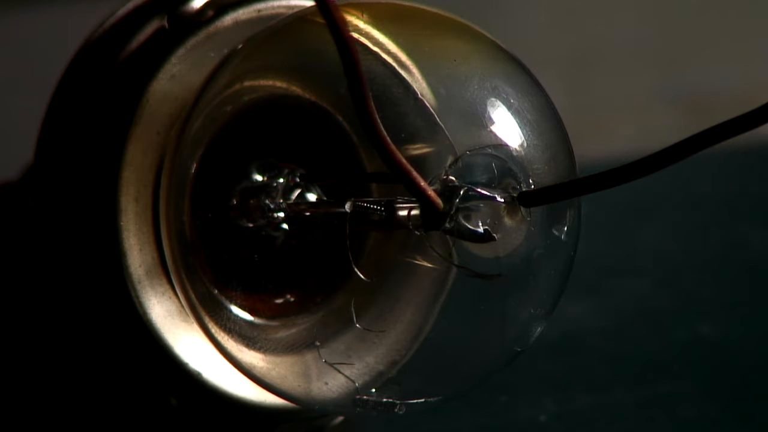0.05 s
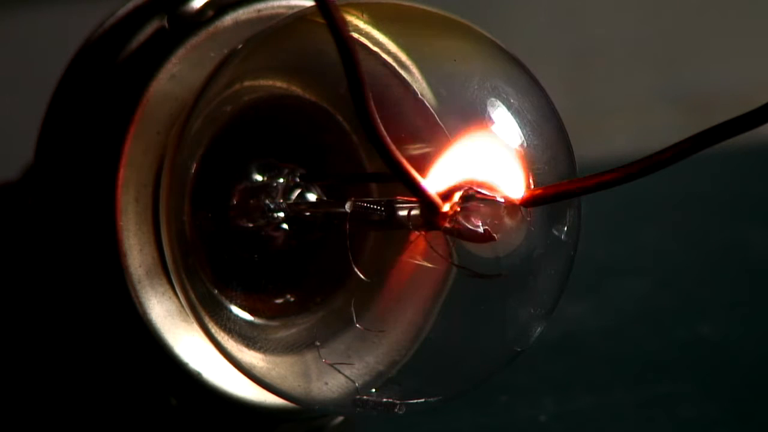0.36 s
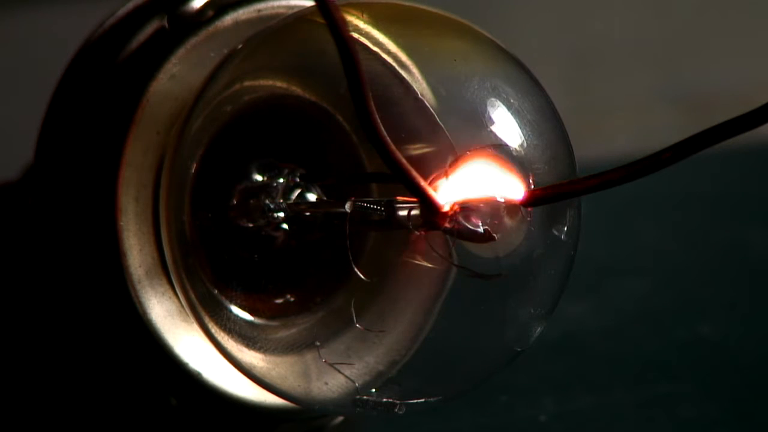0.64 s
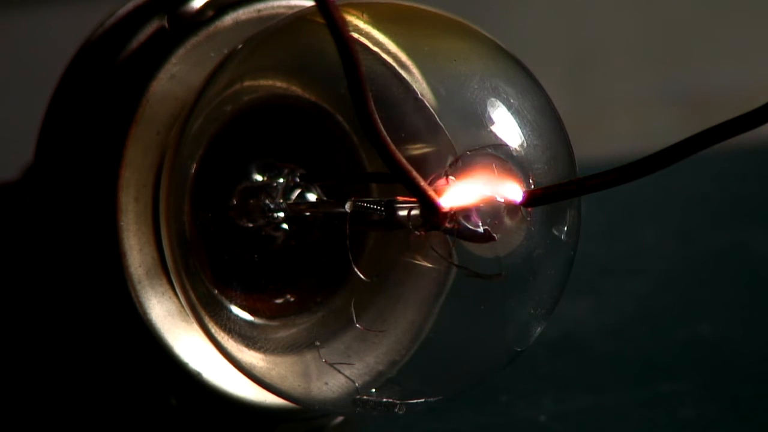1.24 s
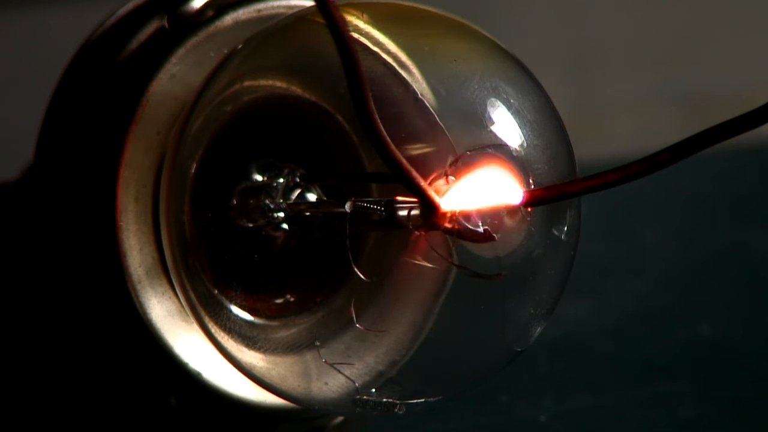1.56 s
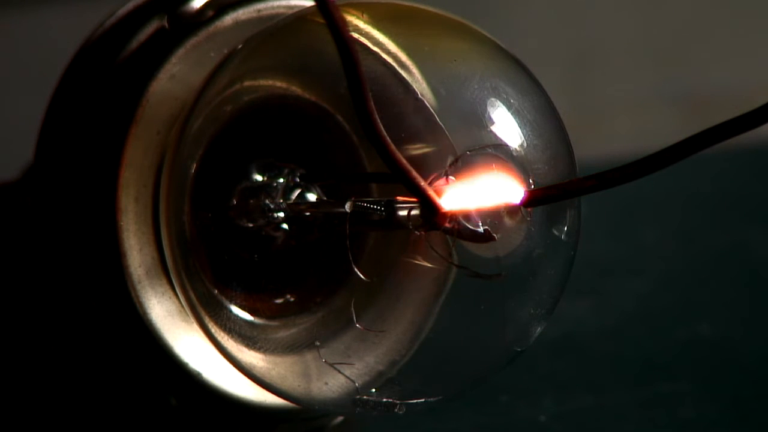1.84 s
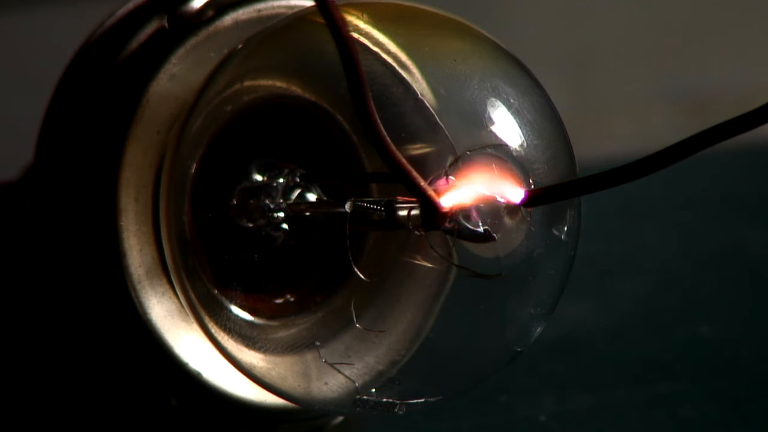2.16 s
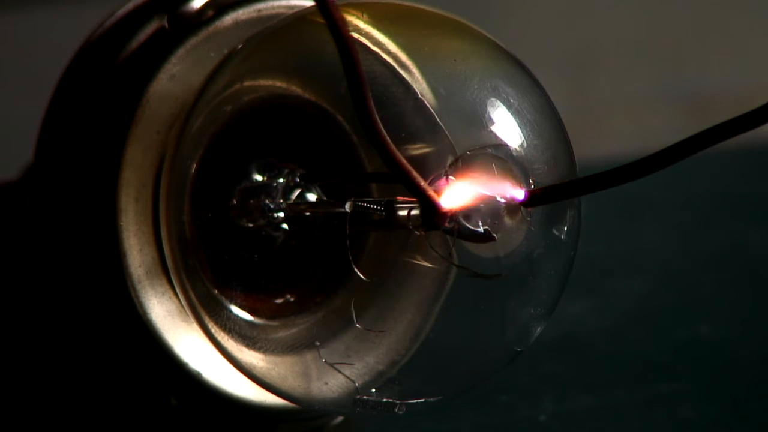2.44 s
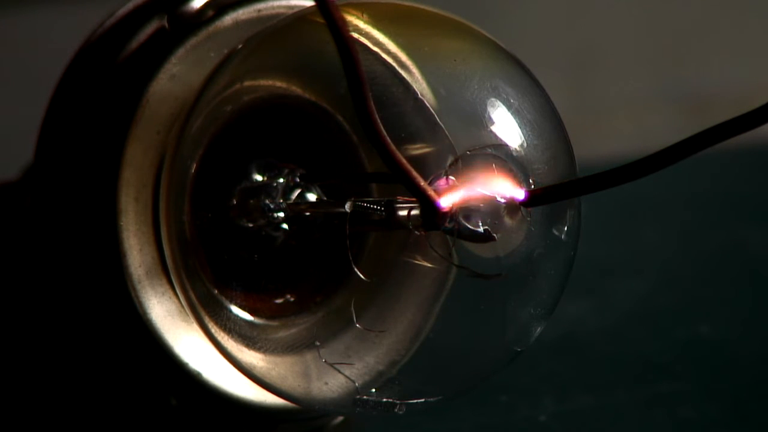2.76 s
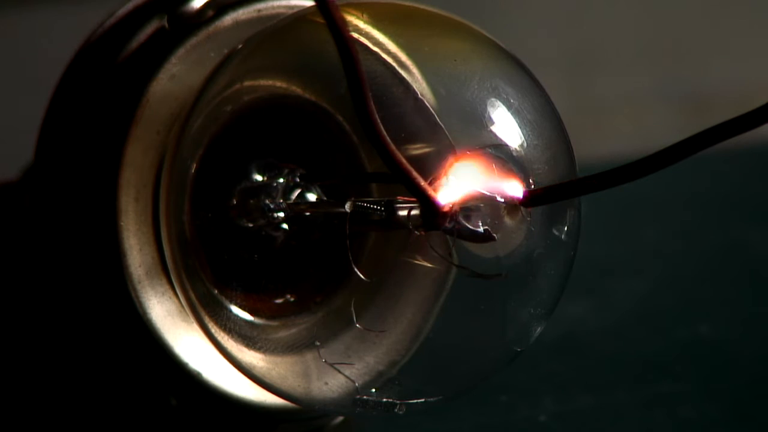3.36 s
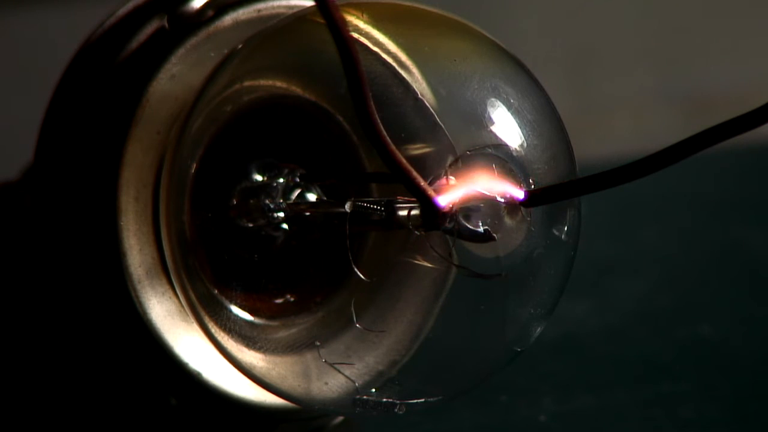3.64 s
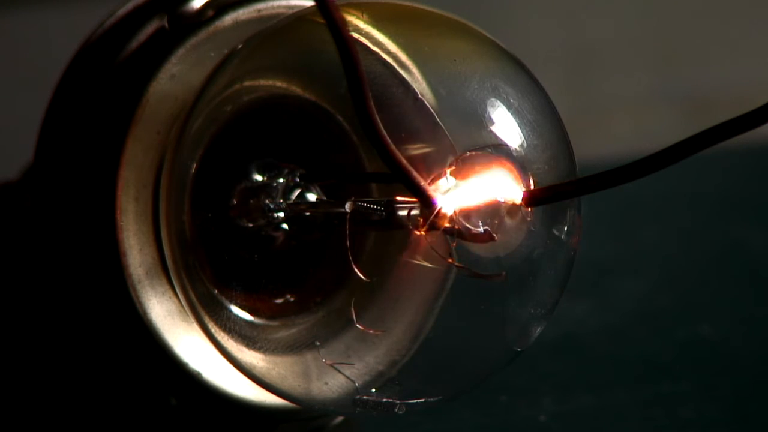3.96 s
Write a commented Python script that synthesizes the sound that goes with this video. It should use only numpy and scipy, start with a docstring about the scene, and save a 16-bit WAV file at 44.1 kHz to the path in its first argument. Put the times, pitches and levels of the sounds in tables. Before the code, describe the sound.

An electric arc buzzing and sizzling close up, with a thin whistle and sharp cracks.

```python
"""A mains-fed high-voltage arc at a glass bulb, the microphone close by in a quiet room, almost mono.
First corona ticks over the supply's hum. At 0.4 s the gap breaks down with a crack. The arc then
restrikes every half-cycle: a thump of heated air, a sharp snap and a whistling train of tiny sparks,
with a frying hiss and sputters in between. From about 3.1 s it falters, misses strikes and cracks hard."""
import sys
import numpy as np
from scipy import signal
from scipy.fft import rfft, irfft, next_fast_len
from scipy.io import wavfile
from scipy.ndimage import uniform_filter1d

SR = 44100
rng = np.random.default_rng(int(sys.argv[2]) if len(sys.argv) > 2 else 0)


def materialize(psi):
    """Save the field psi as 16-bit PCM at rate SR to the path in sys.argv[1].

    A 1-D psi becomes a single channel; in a 2-D psi each row is a channel.
    """
    bounded = np.clip(np.atleast_2d(psi).T, -1, 1)
    quanta = np.round(bounded * 32767).astype(np.int16)
    wavfile.write(sys.argv[1], SR, quanta)


N = 176400

# Strength of the spark trains. Each row: time in seconds, level in dB on even, then odd half-cycles.
TRAIN_LEVELS = [(0.41, -9, -10), (0.56, -5, -1.5), (0.72, -9, -8), (0.81, -4, 0), (0.895, -15, -11),
                (0.913, -16, 3), (1.05, -9, 2.5), (1.11, 4, -1), (1.35, -1.5, -4), (1.6, -14, -13),
                (1.72, -2, -23), (1.844, -8.5, -9), (1.851, 3.5, 3), (1.93, 0, 0), (2.5, 2, 5.5),
                (3.05, 0, .5), (3.55, 2.5, -1), (3.76, 7, -9), (3.8, -4, -14), (4.0, -8, -20)]
# Pitch of the spark trains. Each row: time in seconds, sparks a second.
SPARK_RATE = [(.4, 11700), (1.1, 11250), (1.35, 13000), (1.83, 13300), (1.89, 10000), (1.94, 11700),
              (2.6, 11100), (3.5, 11840)]
# Strength of the restrike snaps. Each row: time in seconds, relative level in dB.
SNAP_LEVELS = [(0.41, -10), (0.48, -8.5), (0.52, -13), (0.55, -8), (0.77, -19), (0.8, -5), (0.87, -14),
               (1.15, -15.5), (1.5, -24.5), (1.83, -24.5), (2.4, -20.5), (3.2, -17.5), (4.0, -14)]
# The arc's unsteadiness. Each row: time in seconds, strike scatter in dB, lag between polarities in seconds.
UNREST = [(.4, 1.6, -.00008), (1, 1.5, -.00015), (1.6, 1, -.00053), (1.9, 0, -.0005), (2.4, 3.5, -.0002),
          (2.85, 2.4, -.00005), (3.4, 2, .00025), (4, 4.5, .0004)]
# Frying between strikes. Each row: time in seconds, level in dB.
FRY_LEVELS = [(.4, -37), (.47, -39.5), (.6, -38.5), (.9, -40.5), (1.05, -45.5), (1.15, -42), (1.5, -49),
              (1.8, -46), (1.86, -42), (1.95, -47.5), (2.8, -50), (2.92, -46.5), (3.02, -48.5),
              (3.2, -49.5), (3.27, -47), (3.35, -52), (4, -57.5)]
# Hard breakdowns. Each row: time in seconds, relative levels of snap and of spark train in dB.
BREAKDOWNS = [(.3956, 5, -2), (0.3965, 4, 13), (3.2406, -4, -2), (3.2508, 3, 6), (3.5105, -4.5, 1),
              (3.6206, -4, 5), (3.6503, -3.5, 3), (3.7301, -3, 3.5), (3.77, -5, -1), (3.8101, -3, -5),
              (3.8407, 4, 2), (3.8505, -2, 0), (3.8801, -6, -2), (3.9411, 4, 2.5), (3.9496, -7, -3),
              (3.9812, -4, 2), (3.9904, 1, 5)]
# The flame's low sputters and bright crackles. Each row: start in seconds, relative level in dB.
SPUTTERS = [(0.447, -24.5), (0.466, -23), (1.839, -34.5), (3.239, -36), (3.262, -32)]
CRACKLES = [(1.399, -26.5), (1.538, -27.5), (1.616, -27), (1.637, -27.5), (1.677, -25.5), (1.848, -26.5),
            (2.076, -29)]
# Each sound's spectrum at the microphone. Each row: frequency in Hz, relative level in dB.
SNAP_COLOUR = [(250, -35), (900, -38.5), (1500, -17), (1900, -12.5), (2300, -4.5), (2780, -8), (3350, -2),
               (3850, -8), (4250, 3.5), (4800, 1), (5250, -5), (5650, -14), (6200, 0), (6900, -10),
               (7800, -1), (8700, -7), (9600, 2), (11500, -5), (15300, -11), (16500, -39)]
TRAIN_COLOUR = [(5000, -12), (8000, -9), (8700, -11.5), (9600, 6.5), (10200, -4.5), (11000, 7),
                (12000, 0.5), (12650, -1), (13300, 4.5), (14000, -3.5), (15300, -13), (16500, -22)]
THUMP_COLOUR = [(40, -64), (100, -5), (200, 0), (300, 1.5), (600, 0.5), (740, -6.5), (910, 5.5), (1300, 1),
                (1800, -2.5), (2600, -20.5)]
FRY_COLOUR = [(100, -25), (350, -7.5), (650, -9.5), (950, -1.5), (1700, -5.5), (2300, 2.5), (2800, -4),
              (3300, 2), (3850, -3.5), (4500, 6), (5600, -5), (6300, -3), (7500, -11.5), (11000, -4),
              (16000, -44)]
SPUTTER_COLOUR = [(150, -14), (720, -8.5), (950, 8), (1300, -9.5), (3000, 0.5), (7000, -32)]
ROOM_TONE_COLOUR = [(12, -32), (20, -8), (96, -12.5), (150, -11), (434, -12.5), (802, -17), (8650, -25),
                    (13900, -22.5), (16000, -31)]
# The supply's hum. Each row: frequency in Hz, rms level in dB.
SUPPLY_HUM = [(50.06, -70.5), (150.18, -63)]
# Echoes off nearby surfaces. Each row: delay in seconds, gain as a factor.
NEAR_ECHOES = [(.00055, 0.058), (.00085, 0.06), (.0013, 0.05), (.003, 0.055), (.0034, 0.087)]
# The room's reverberation. Each row: frequency in Hz, seconds to fall by 60 dB.
ROOM_DECAY = [(200, 0.04), (700, 0.22), (2000, 0.048), (6000, 0.16), (14000, 0.1)]

STRIKE_HZ = 100.12  # two restrikes a mains cycle
LIT_S, FIRST_RESTRIKE_S, FALTER_S = .3975, .4044, 3.12  # the arc lights, restrikes, grows unstable
THUMP_DB, SNAP_DB, TRAIN_DB = -22.4, 3, 5.5
TRAIN_CEILING_DB = 3.5  # ahead of TRAIN_DB: a restrike draws no more than the supply gives
JITTER_S, MISS_SHARE, MISS_DB = .000016, .02, -10
FALTER_JITTER_S, FALTER_MISSES, FALTER_THUMP_DB = .00022, .5, -3  # added as the arc falters
ROOM_TONE_DB, REVERB_DB, SIDE_DB = -61, -17, -44.5


def amp(db):
    """Decibels to amplitude."""
    return 10 ** (np.asarray(db) / 20)


def unit(x):
    """x scaled to an rms of one."""
    return x / np.sqrt(np.mean(x ** 2) + 1e-20)


def at_hz(points, hz):
    """A curve read on a log frequency axis."""
    freqs, values = np.transpose(points)
    return np.interp(np.log(hz + 1), np.log(freqs + 1), values)


def at_time(rows, s):
    """Each column of a curve at the times s."""
    times, *columns = np.transpose(rows)
    return [np.interp(s, times, column) for column in columns]


def highpass(x, hz, order=2):
    """The part of x above hz."""
    return signal.sosfilt(signal.butter(order, hz, "high", fs=SR, output="sos"), x)


def coloured(x, colour, size=4096):
    """x through a causal filter of unit energy."""
    db = np.maximum(at_hz(colour, np.fft.rfftfreq(size, 1 / SR)), -90)
    cepstrum = irfft(np.log(amp(db)))
    cepstrum[1:size // 2] *= 2  # fold to minimum phase
    cepstrum[size // 2 + 1:] = 0
    ring = irfft(np.exp(rfft(cepstrum)))
    return signal.fftconvolve(x, ring / np.linalg.norm(ring))[:N]


def pulses(s, gain, size=8):
    """Impulses placed between samples."""
    pos = np.ravel(s)[:, None] * SR
    index = np.floor(pos).astype(int) + np.arange(1 - size, size + 1)
    shape = np.sinc(index - pos) * np.sinc((index - pos) / size) * np.ravel(gain)[:, None]
    return np.bincount(np.clip(index, 0, N).ravel(), shape.ravel(), N + 1)[:N]


def room_tone():
    """The still room and the supply's hum, behind everything."""
    t = np.arange(N) / SR
    hum = sum(np.sqrt(2) * amp(db) * np.sin(2 * np.pi * (hz * t + rng.random())) for hz, db in SUPPLY_HUM)
    return hum + amp(ROOM_TONE_DB) * unit(coloured(rng.standard_normal(N), ROOM_TONE_COLOUR))


def room_reverb(x, rise_s=.00044):
    """The room's short tail, each band dying at its own pace."""
    hz, t, bands = signal.stft(rng.standard_normal(SR // 2), SR, nperseg=256)
    decay = amp(-60 * t / at_hz(ROOM_DECAY, hz)[:, None])
    tail = signal.istft(bands * decay, SR, nperseg=256)[1]
    tail *= 1 - np.exp(-np.arange(len(tail)) / SR / rise_s)
    return signal.fftconvolve(x, tail / np.linalg.norm(tail))[:N]


def corona(first_s=.0167, width_s=.00056, start_db=-56, db_per_s=34):
    """Before the breakdown, a puff of fizz once a mains cycle, growing with the voltage."""
    t = np.arange(N) / SR
    from_puff_s = (t - first_s + 1 / STRIKE_HZ) % (2 / STRIKE_HZ) - 1 / STRIKE_HZ
    puffs = np.exp(-.5 * (from_puff_s / width_s) ** 2)
    level = amp(start_db + db_per_s * t) * puffs * (t < LIT_S)
    return coloured(rng.standard_normal(N) * level, TRAIN_COLOUR)


def frying(grain_db=16.4):
    """Grainy hiss that follows the current between strikes."""
    t = np.arange(N) / SR
    current = .52 + np.sin(np.pi * STRIKE_HZ * (t - FIRST_RESTRIKE_S)) ** 2
    grain = np.tanh(unit(uniform_filter1d(rng.standard_normal(N), size=60)))
    hiss = unit(coloured(rng.standard_normal(N) * amp(grain_db * grain) * current, FRY_COLOUR))
    return hiss * amp(at_time(FRY_LEVELS, t)[0]) * (t > LIT_S)


def pops(per_s=80, gain_db=6, spread_db=2):
    """Tiny random pops in the flame, following the level of its frying."""
    when, rarity = rng.random((int(per_s * N / SR), 2)).T
    s = LIT_S + when * (N / SR - LIT_S)
    db = at_time(FRY_LEVELS, s)[0] + gain_db - spread_db * np.log(rarity + .02)
    return coloured(pulses(s, amp(db)), FRY_COLOUR)


def spits(events, colour, rise_s, decay_s):
    """Short noisy spits of the flame."""
    s, db = np.transpose(events)
    age = np.maximum(np.arange(N) / SR - s[:, None], 0)
    envelopes = np.exp(-age / decay_s) * (1 - np.exp(-age / rise_s))
    return coloured(rng.standard_normal(N) * (amp(db) @ envelopes), colour)


def sputters():
    """The flame's low, slower sputters and brighter, quicker crackles."""
    low = spits(SPUTTERS, SPUTTER_COLOUR, rise_s=.0017, decay_s=.0032)
    return low + spits(CRACKLES, FRY_COLOUR, rise_s=.00031, decay_s=.0022)


def spark_trains(s, db, count=13, rate_spread=.035, spacing_jitter=.13, max_width_s=.00014):
    """At each time a run of tiny sparks swells and fades at its own pace, so fast that it whistles."""
    chance = rng.standard_normal((len(s), count + 1))
    hz = at_time(SPARK_RATE, s)[0] * (1 + rate_spread * np.clip(chance[:, 0], -2, 2))
    offset_s = (np.arange(count) - count // 2 + spacing_jitter * chance[:, 1:]) / hz[:, None]
    width_s = max_width_s * amp(.42 * np.clip(db, -12, 0))  # stronger trains last longer
    swell = np.exp(-.5 * (offset_s / width_s[:, None]) ** 2)
    swell /= swell.sum(axis=1, keepdims=True)
    sparks = pulses(s[:, None] + offset_s, amp(db)[:, None] * swell)
    return amp(TRAIN_DB) * coloured(highpass(sparks, hz=4000), TRAIN_COLOUR)


def cracks(count=4, length_s=.0008, snap_gain_db=-1):
    """The first breakdown and the late hard restrikes: a few big sparks at uneven gaps, and a train."""
    s, snap_db, train_db = np.transpose(BREAKDOWNS)
    offset_s = length_s * (np.arange(count) + rng.random((len(s), count)) - 1) / count
    gain = np.repeat(amp(snap_db + snap_gain_db), count) / np.sqrt(count)
    sparks = highpass(pulses(s[:, None] + offset_s, gain), hz=4000)
    return coloured(sparks, SNAP_COLOUR) + spark_trains(s + .00028, train_db)


def restrikes():
    """Each half-cycle relights the arc; the two polarities differ in timing and strength.
    As it falters, its timing loosens, its thumps weaken and one polarity often barely whistles."""
    strike = np.arange(int((N / SR - FIRST_RESTRIKE_S) * STRIKE_HZ) + 1)
    s, odd = FIRST_RESTRIKE_S + strike / STRIKE_HZ, strike % 2
    scatter_db, lag_s = at_time(UNREST, s)
    falter = np.interp(s, [FALTER_S, N / SR], [0, 1])
    time_draw, train_draw, snap_draw, thump_draw = np.sqrt(3) * rng.uniform(-1, 1, (len(s), 4)).T
    missed = rng.random(len(s)) < odd * (MISS_SHARE + FALTER_MISSES * falter)
    s = s + lag_s * (.5 - odd) + (JITTER_S + FALTER_JITTER_S * falter ** 2) * time_draw
    even_db, odd_db = at_time(TRAIN_LEVELS, s)
    train_db = np.where(odd, odd_db, even_db) + scatter_db * train_draw
    train_db = np.minimum(train_db, TRAIN_CEILING_DB) + MISS_DB * missed
    snap_db = at_time(SNAP_LEVELS, s)[0] + SNAP_DB + scatter_db * snap_draw
    thump_db = THUMP_DB + 1.8 * (odd - .5) + FALTER_THUMP_DB * falter ** 2 * (1 + thump_draw) / 2
    to_crack_s = np.abs(s[:, None] - np.transpose(BREAKDOWNS)[0]).min(axis=1)
    soft = to_crack_s > .5 / STRIKE_HZ  # otherwise a crack replaces the snap and train
    snaps = coloured(pulses(s[soft], amp(snap_db[soft])), SNAP_COLOUR)
    thumps = coloured(pulses(s - .0002, amp(thump_db)), THUMP_COLOUR)
    return spark_trains(s[soft], train_db[soft]) + snaps + thumps


def scene():
    """The arc up close and centred, the room behind it; only the treble differs a little left to right."""
    arc = restrikes() + cracks() + frying() + pops() + sputters() + corona()
    echoes = signal.fftconvolve(arc, pulses(*np.transpose(NEAR_ECHOES)))[:N]
    mid = arc + echoes + amp(REVERB_DB) * room_reverb(arc) + room_tone()
    side = amp(SIDE_DB) * room_reverb(highpass(arc, hz=1500, order=10))
    return np.array([mid + side, mid - side])


def record(dry):
    """The recorder keeps nothing above its band limit."""
    size = next_fast_len(N + SR // 2)
    in_band = np.fft.rfftfreq(size, 1 / SR) < 16600  # Hz
    return irfft(rfft(dry, size) * in_band, size)[:, :N]


dry = scene()
out = record(dry)
materialize(out)
```